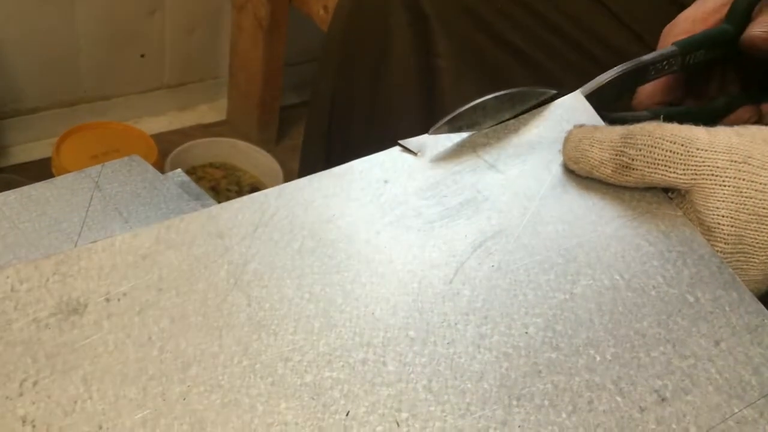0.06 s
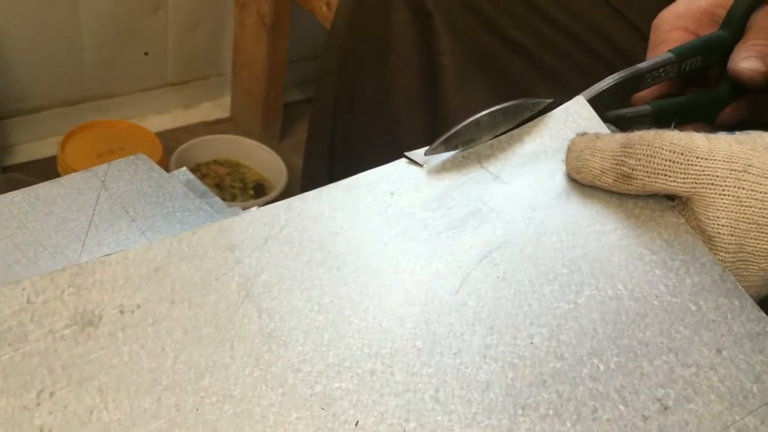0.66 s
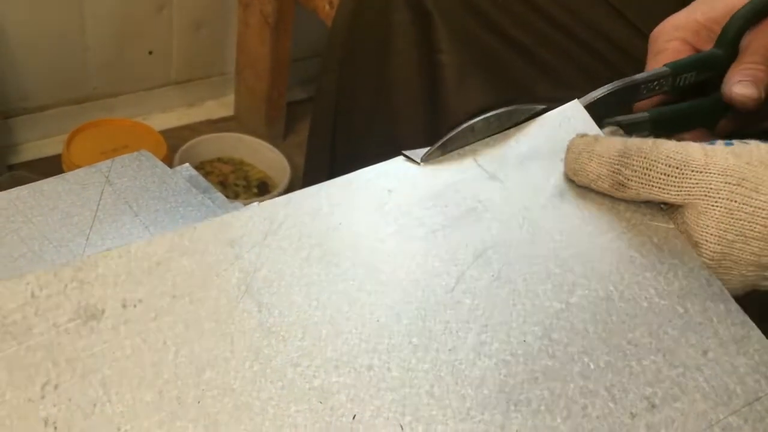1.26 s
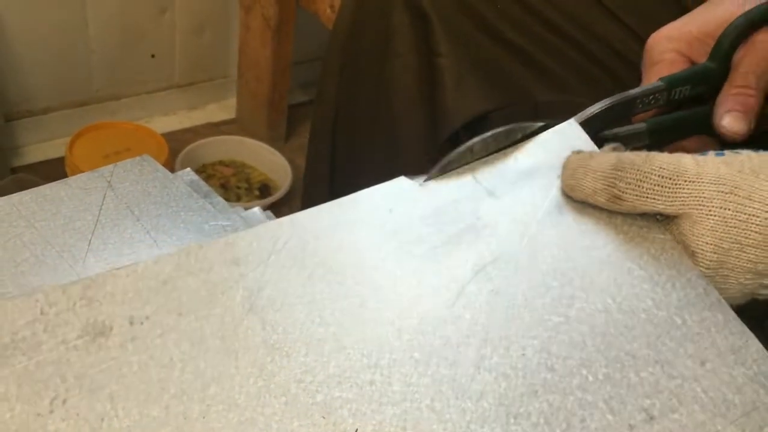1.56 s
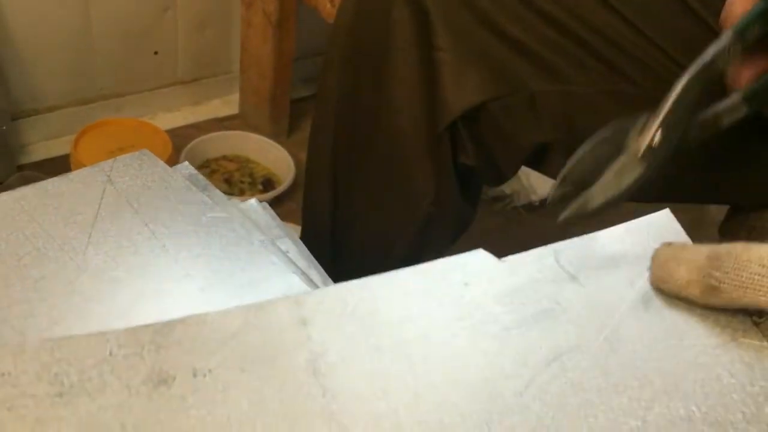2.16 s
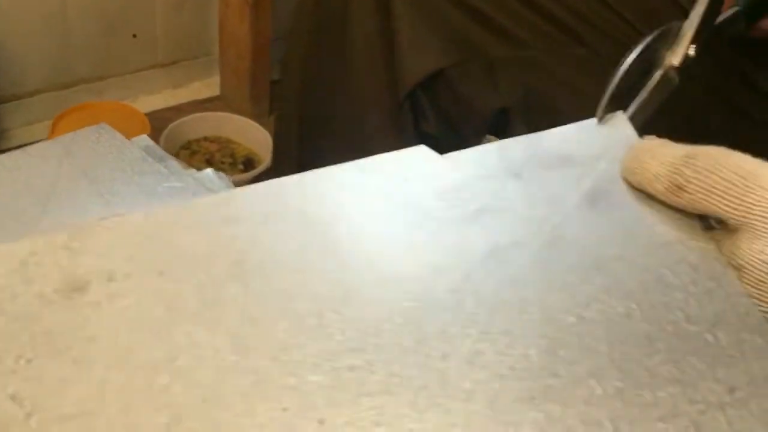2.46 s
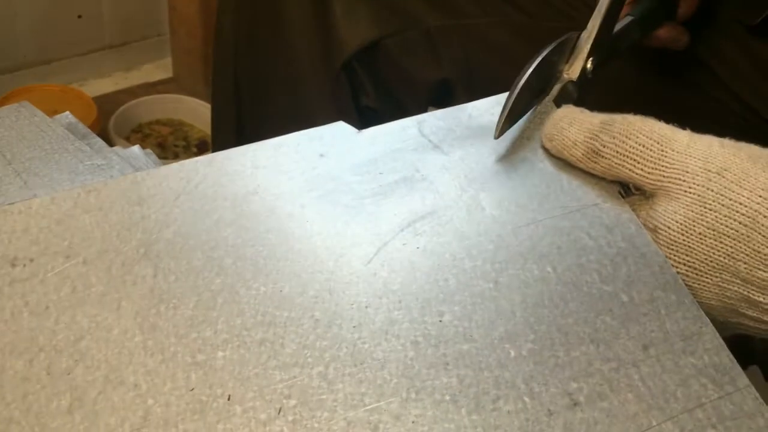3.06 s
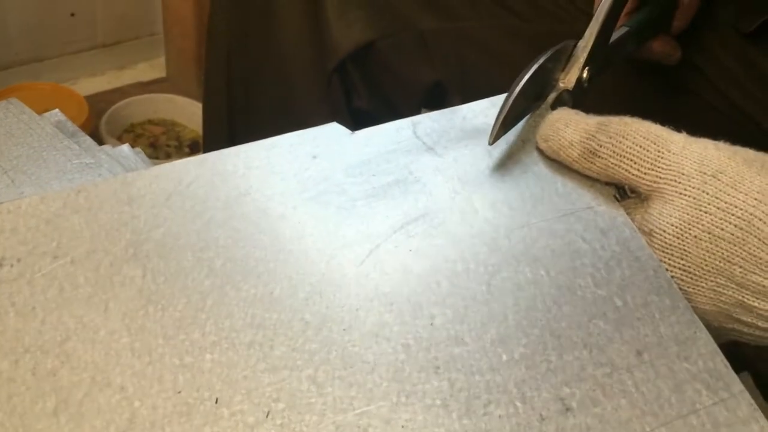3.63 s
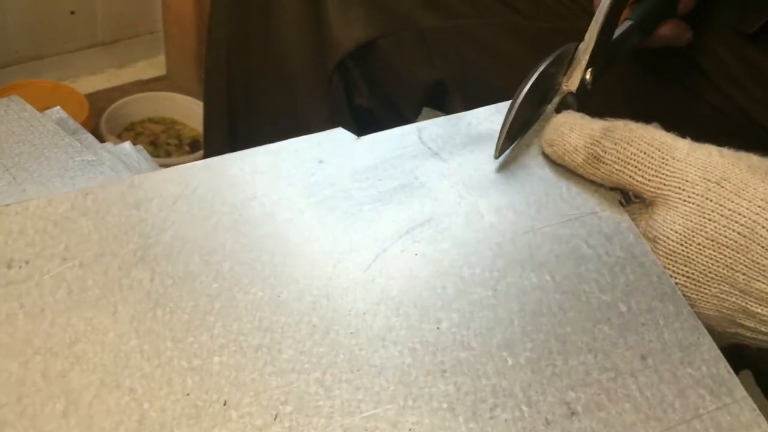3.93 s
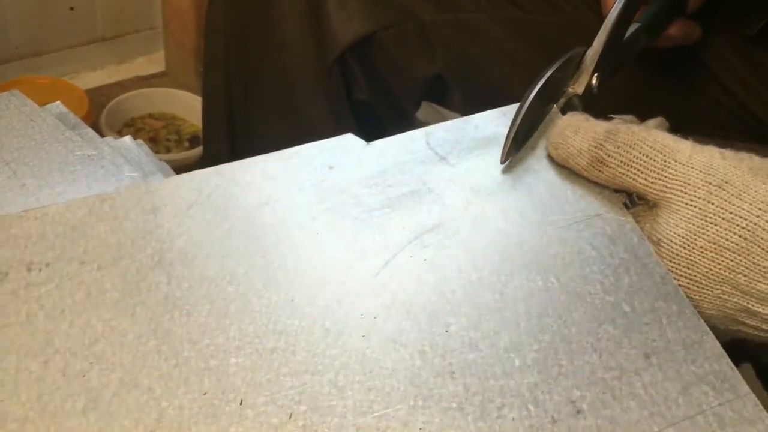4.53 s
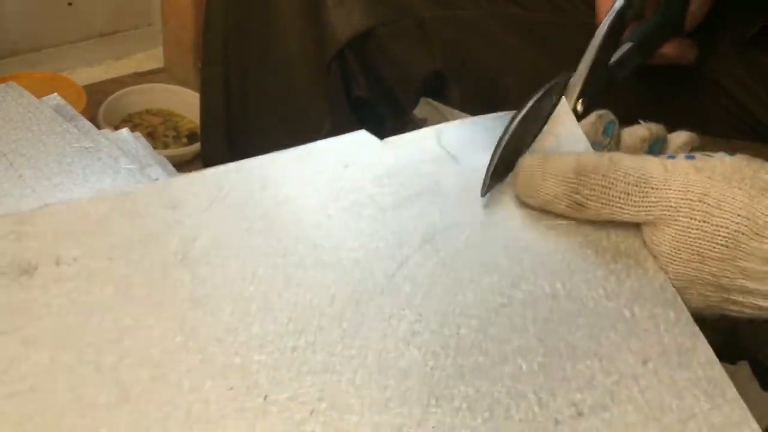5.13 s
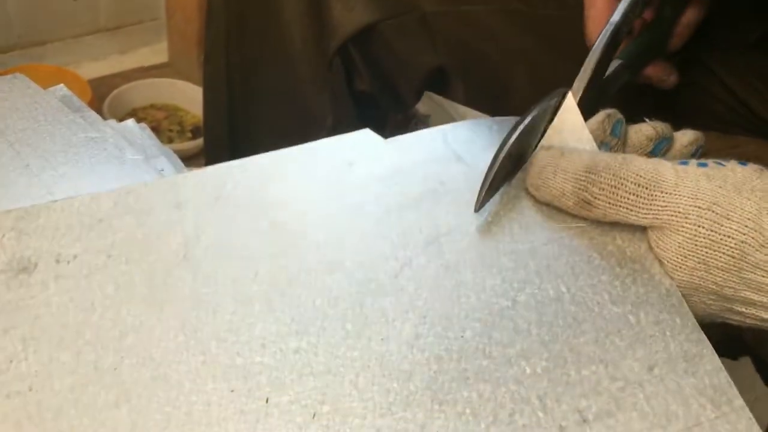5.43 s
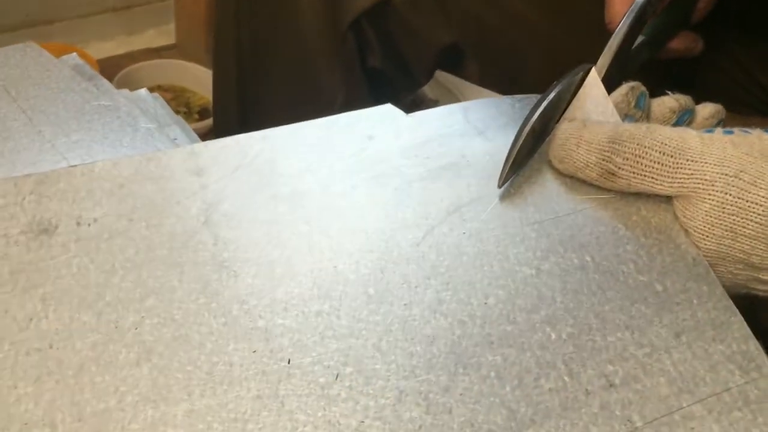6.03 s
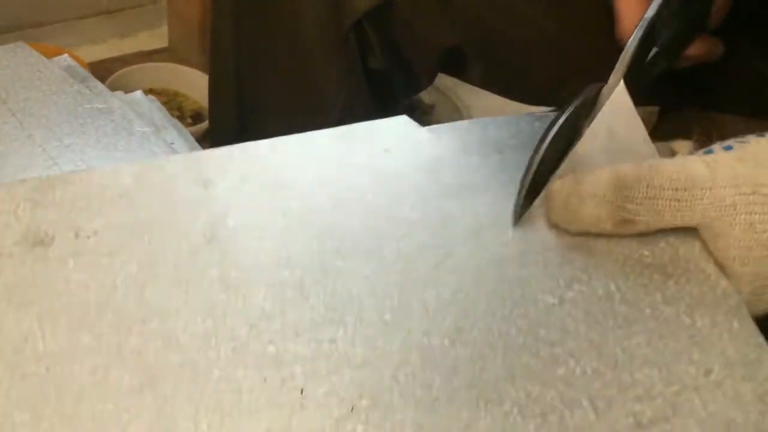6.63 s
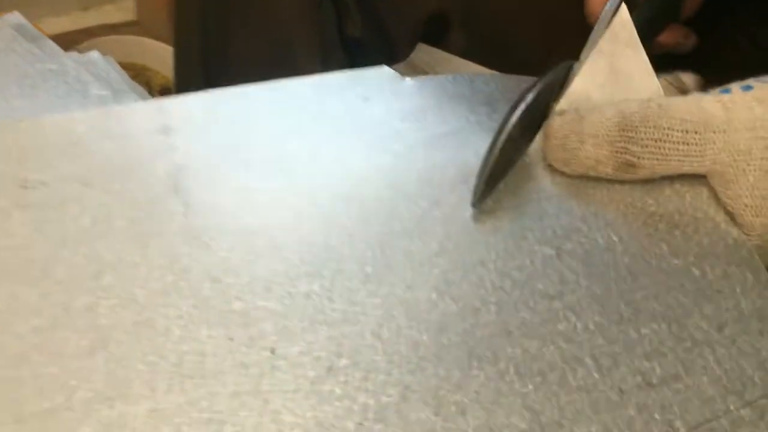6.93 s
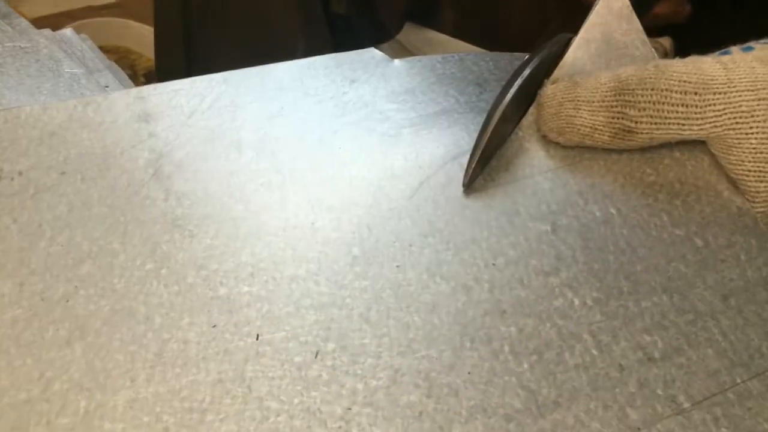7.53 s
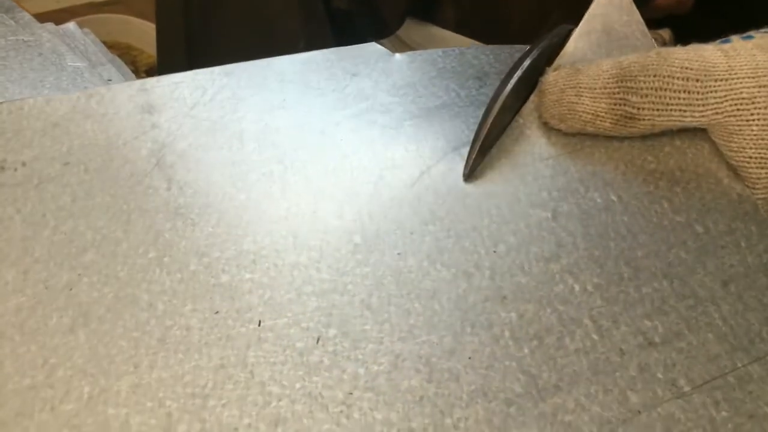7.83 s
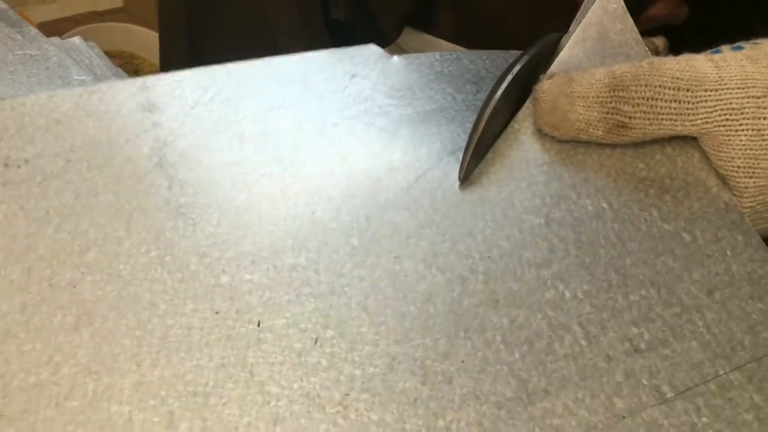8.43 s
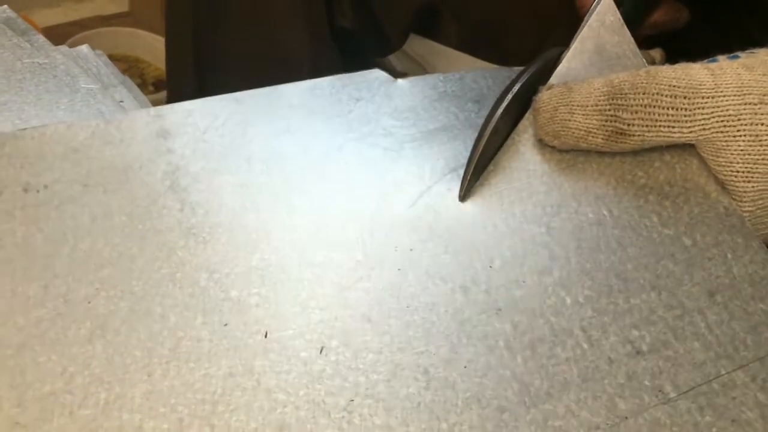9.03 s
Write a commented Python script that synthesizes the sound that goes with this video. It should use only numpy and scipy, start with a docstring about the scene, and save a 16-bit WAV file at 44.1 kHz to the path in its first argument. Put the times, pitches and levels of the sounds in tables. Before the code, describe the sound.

Tin snips bite through thin sheet metal with crunching clicks and clangs, while the sheet wobbles and scrapes over a low hum.

```python
"""A small workshop, close up at the bench: tin snips bite through a thin galvanized sheet.
A mains hum throbs underneath. The bench takes soft bumps; the blades clink and squeak, the pivot clacks.
Under the blades the sheet creaks and ticks; shoved about, it wobbles, scrapes and sings in sliding tones.
On top, each fracture knocks the sheet with a crunch and a clang and rings the strip curling off the cut.
Strain on the sheet lifts its pitch and thins its boom."""
import sys
import numpy as np
from scipy import signal
from scipy.fft import rfft, irfft
from scipy.io import wavfile

SR = 44100
rng = np.random.default_rng(int(sys.argv[2]) if len(sys.argv) > 2 else 0)


def master(y):
    """Save y as 16-bit WAV."""
    cut = np.clip(np.atleast_2d(y).T, -1, 1)
    pcm = np.round(cut * 32767)  # scale
    wavfile.write(sys.argv[1], SR, pcm.astype(np.int16))


N = 409248
TIME = np.arange(N) / SR
TAIL = TIME[:SR * 3 // 4]  # time axis of a one-shot

# Table levels are relative: each layer adds its own trims.
# tone of the room air: f/Hz, level/dB
AIR_EQ = [(15, -36), (25, -10.5), (55, -2), (75, -12.5), (107, -13), (126, -20), (160, -13), (267, -25.5),
          (305, -23.5), (469, -31.5), (523, -29), (703, -32), (1020, -34), (1850, -51), (4500, -58),
          (15500, -61)]
# partials of the hum: f/Hz, level/dB
HUM_PARTIALS = [(50, -54), (100, -60.5), (150, -61.5), (175, -64), (200, -71.5)]
# soft bumps against the bench: t/s, level/dB, f/Hz
BENCH_BUMPS = [(0.139, -33, 54.87), (0.179, -29.5, 63), (0.991, -30, 62), (2.313, -35, 64.6),
               (8.477, -29.5, 77.6)]
# one dull tick: t/s, level/dB, f/Hz, half-width/s
BENCH_TICK = (3.1765, -40, 1380, 0.0009)

# the blades clinking together: t/s, ring/dB, grit/dB, time until the hand mutes them/s
BLADE_CLINKS = [(2.354, -50, -62, 0.13), (2.549, -64, -60, 0.02), (2.571, -45, -51, 0.05)]
# ring of the blades: f/Hz, level/dB, t60/s
BLADE_MODES = [(4140, -10, .3), (5750, -11, .16), (6823, 0, .25), (7817, -6, .27), (8150, -2, .24),
               (8400, -6, .2), (11250, -8, .22), (11430, -8, .25), (12120, -4, .15), (13660, -8, .22),
               (15700, -5, .12)]
# squeaks of the blades rubbing each other and the cut edge, and short pings of the strip curling off the cut
# (the 3.2 kHz rows near 4.8 s): t/s, level/dB, f/Hz, bandwidth/Hz, decay/s
SQUEAKS_AND_PINGS = [(0.401, -48, 6680, 650, 0.024), (0.401, -54, 13500, 1800, .02),
                     (2.345, -40, 1830, 350, .016), (2.624, -48.5, 4360, 300, 0.007),
                     (2.624, -47.5, 5770, 350, 0.008), (4.427, -47, 3700, 1400, 0.006),
                     (4.764, -55, 3200, 300, 0.011), (4.803, -56, 3250, 350, 0.009),
                     (5.954, -50, 8900, 1500, 0.0036), (7.410, -45, 3000, 1400, 0.004),
                     (7.411, -51, 6200, 2200, 0.016), (7.411, -51, 4150, 200, 0.026)]
# the pivot catching: t/s, clack/dB, rasp/dB, rasp decay/s
PIVOT_CATCHES = [(0.008, -62, -54.5, 0.011), (0.018, -60, -55.5, 0.027), (0.578, -56.5, -76, 0.005),
                 (0.588, -57, -64, 0.0027)]
# clack of the pivot: f/Hz, level/dB, t60/s
PIVOT_MODES = [(2110, -8, .11), (3320, -5, .1), (4565, 1, .11), (5000, -7, .07), (6400, -6, .1),
               (7360, -5, .1), (8600, -3, .1), (10420, -5, .1), (12200, -4, .09), (13220, -3, .09)]

# the sheet's strongest modes: f/Hz, level/dB, t60/s
SHEET_MODES = [(293, -6, .5), (375, -5, .5), (530, -6, .35), (612, 1, .42), (785, -3, .4), (870, -6, .4),
               (952, 2, .42), (1055, -1, .42), (1305, -3, .35), (1372, -2, .35), (1825, 2, .35),
               (2255, 0, .42), (2640, -1, .3), (2923, -1, .3)]
# decay of its dense weaker modes and of the room: f/Hz, t60/s
WASH_DECAY = [(200, 0.73), (600, 0.77), (1000, 0.5), (2000, 0.4), (5000, 0.31), (14000, 0.28)]
# the blades strain the sheet and lift its resonances, slack lowers them: t/s, pitch factor
SHEET_STRAIN = [(1.7, 1.046), (2.0, 1.003), (2.5, 0.92), (2.85, 0.88), (4.5, 0.97), (5.2, 1.01),
                (6.0, 1.065), (6.42, 1.11), (6.77, 1.11), (6.95, 1.005), (7.5, 1.07), (7.85, 1.045),
                (8.2, 0.97), (9.15, 1.018)]
# the sheet's low heave: f/Hz, level/dB
BOOM_EQ = [(60, -35.5), (140, -7), (230, -5.5), (410, -5), (490, -5.5), (700, -37)]
# its midrange clang: f/Hz, level/dB
CLANG_EQ = [(300, -56), (480, -10), (590, 6.5), (720, 2.5), (960, 2), (1150, -8), (1400, -11.5),
            (1800, -27.5), (3500, -55)]
# the bite of breaking steel: f/Hz, level/dB
CRUNCH_EQ = [(600, -24), (1300, 9), (1750, 2), (2800, 2.5), (4500, -2.5), (7000, -13.5), (12000, -61)]
# the finest splinters: f/Hz, level/dB
SIZZLE_EQ = [(3500, -14), (6500, 0.5), (8500, 0), (10500, -5.5), (15000, -5)]
# steel sliding on steel: f/Hz, level/dB
SCRAPE_EQ = [(700, -12), (1400, 9.5), (2000, 0), (3100, 2), (5000, -1), (7500, -3), (10500, -7.5),
             (15000, -8.5)]
# the strip curling off the cut: f/Hz, level/dB, t60/s
OFFCUT_MODES = [(2630, 6.5, 0.17), (2830, 5.5, 0.098), (3176, -1, 0.27), (3520, 2, 0.15)]
# the severed strip ringing freely: f/Hz, level/dB, t60/s
SEVERED_MODES = [(2256, -13, .6), (3408, -2, .22), (3989, 0, .33), (4737, -4, .29), (5356, -5, .26),
                 (8565, -14, .26)]

# tiny fractures at the cutting edge: t/s, tick/dB, knock/dB
EDGE_TICKS = [(0.231, -67, -58), (0.683, -65, -41), (1.091, -62, -34.5), (1.169, -60, -33),
              (2.855, -62.5, -43.5), (2.918, -57.5, -44), (4.425, -55, -53), (4.654, -65, -44.5),
              (4.802, -64, -40), (4.853, -64, -40), (4.966, -59, -59), (5.806, -69, -43.5),
              (5.955, -63, -70), (6.246, -76, -39), (6.273, -66, -41), (6.376, -68, -36), (6.440, -67, -40),
              (6.461, -70, -39), (6.732, -65, -45), (6.801, -51, -30.5), (6.904, -57, -41.5),
              (7.410, -63, -34), (7.514, -73, -35.5), (7.712, -79, -35), (7.823, -49, -31.5),
              (7.907, -76, -35)]
# single resonances sliding as the sheet bends: t/s, length/s, level/dB, start f/Hz, end f/Hz
BEND_GLIDES = [(0.33, 0.149, -45.5, 410, 351), (1.268, 0.19, -40.5, 285.2, 347),
               (1.879, 0.31, -37.5, 614, 578), (1.92, 0.17, -41, 299, 235), (1.99, 0.14, -41.5, 174.5, 163),
               (2.334, 0.074, -36, 421, 406), (2.479, 0.47, -45, 583.5, 487), (2.56, 0.11, -40, 235, 177),
               (2.586, 0.13, -42, 85, 49.4), (2.659, 0.26, -40.5, 229, 135),
               (5.187, 0.16, -37.5, 414.6, 382), (6.389, 0.2, -44, 988, 1095),
               (6.754, 0.094, -44.5, 1051, 798), (7.679, 0.095, -44, 965, 926),
               (9.165, 0.05, -30, 300.6, 270)]
# shoves that bend and slide the sheet: t/s, rise/s, hold/s, wobble/dB, scrape/dB
SHEET_SHOVES = [(1.238, 0.083, 0.017, -38.5, -58), (1.866, 0.027, 0.15, -40, -54.5),
                (2.256, 0.026, 0.063, -67, -60.5), (2.503, 0.077, 0.0065, -42, -47),
                (2.637, 0.018, 0.025, -48, -64), (2.852, 0.0092, 0.06, -57.5, -59),
                (4.91, 0.086, .012, -51.5, -64.5), (5.138, 0.048, 0.02, -39, -45),
                (5.448, 0.058, 0.0065, -55, -63), (6.476, 0.015, 0.12, -54, -65.5),
                (6.709, 0.051, 0.033, -41, -48), (9.168, 0.0058, 0.056, -37.5, -72.5)]
# the steel breaking or the blades striking it: t/s, knock/dB, knock f/Hz, ring/dB, crunch/dB
SHEET_BLOWS = [(0.007, -33, 790, -37, -53.5), (0.315, -33, 596, -51, -62), (0.327, -25.5, 543, -37.5, -57),
               (0.401, -26.5, 636, -33, -56), (0.916, -24, 836.2, -40, -53.5),
               (0.971, -24.5, 960, -40.5, -56.5), (1.046, -28.5, 590, -44, -63),
               (1.109, -14.5, 820, -34, -46.5), (1.675, -1.5, 875, -21.5, -30.5),
               (1.693, -7, 607, -32.5, -36.5), (1.893, -30, 670, -42, -57), (2.34, -24, 452, -34.5, -40.5),
               (2.347, -12, 450, -33.5, -35.5), (2.4875, -16, 930, -32.5, -43.5),
               (4.562, -32, 720, -48, -61.5), (4.761, -23, 670, -45, -54.5), (4.877, -38, 576, -34, -49.5),
               (5.171, -16, 686, -30, -48), (5.193, -17.5, 794, -26.5, -44), (6.073, -32, 849.6, -66, -71),
               (6.209, -24.5, 800, -41, -55.5), (6.300, -20, 920, -34, -52.5),
               (6.396, -21.5, 920, -33.5, -50), (7.408, -31, 660, -36, -44.5), (7.511, -50, 720, -35, -54),
               (7.658, -26.5, 610, -36, -53), (7.810, -28, 1090, -33, -57), (7.825, -24, 680, -29.5, -49.5),
               (8.194, -22.5, 710, -40, -59.5), (8.431, -35, 825, -50, -77), (8.515, -27.5, 855, -45, -66),
               (8.54, -24.5, 780, -39, -63), (8.884, -31, 624, -46, -88), (9.133, -22, 940, -29, -48),
               (9.165, -20, 619.6, -27.5, -49.5)]

LIGHT_KNOCK_HZ = 820  # on the unstrained sheet
ATTACK = 1024  # samples over which a hit's level is set


def amp(db):
    """Decibels to gain."""
    return 10 ** (np.asarray(db) / 20)


def unit(x, size=None):
    """Scales to rms 1, judged over the first size samples."""
    return x / np.sqrt(np.mean(x[:size] ** 2) + 1e-20)


def curve_at(points, hz):
    """Reads a curve on a log-frequency axis."""
    f, value = np.transpose(points)
    return np.interp(np.log(hz + 1), np.log(f), value)


def add(mix, s, sound):
    """Drops a sound into the mix at time s."""
    part = mix[max(round(s * SR), 0):][:len(sound)]
    part += sound[:len(part)]


def colour(x, eq, size=4096):
    """Minimum-phase EQ, rolling off 12 dB per octave beyond the ends of the curve."""
    hz = abs(np.fft.fftfreq(size, 1 / SR))
    beyond = abs(np.log((hz + 1) / np.clip(hz + 1, eq[0][0], eq[-1][0])))
    log_gain = np.log(amp(curve_at(eq, hz))) - 2 * beyond
    taps = np.fft.ifft(np.exp(np.conj(signal.hilbert(log_gain)))).real
    return signal.oaconvolve(x, taps[:size // 2])[:len(x)]


def drift(per_s):
    """Random modulator, gliding to a new value per_s times a second."""
    knots = rng.standard_normal(4096)
    return np.interp(TIME * per_s, np.arange(len(knots)), knots)


def modes(table, pitch=1, spread_db=3):
    """Dying sines; each hit lands elsewhere and weights them a little differently."""
    out = np.zeros(len(TAIL))
    for hz, db, t60 in table:
        envelope = amp(db + rng.normal(0, spread_db) - 60 * TAIL / t60)
        out += envelope * np.sin(2 * np.pi * (hz * pitch * TAIL + rng.random()))
    return out


def ping(table):
    """A small steel part ringing, its attack at unit level."""
    return unit(modes(table, spread_db=0.62), ATTACK)


def slips(decay_s):
    """A short, spiky run of slips in the steel."""
    spikes = rng.standard_normal(len(TAIL)) * rng.standard_normal(len(TAIL))
    return unit(spikes) * np.exp(-TAIL / decay_s)


def wash():
    """Countless close modes and reflections, each band dying at its own speed."""
    hz, t, bands = signal.stft(rng.standard_normal(len(TAIL)), SR, nperseg=256)
    decay = amp(-60 * t / curve_at(WASH_DECAY, hz)[:, None])
    _, tail = signal.istft(bands * decay, SR, nperseg=256)
    return unit(tail[:len(TAIL)], ATTACK)


def room_tone(air_db=-46, throb_depth=0.24, throb_hz=25, waver_db=2.5, swell_db=1):
    """The bed: gently swelling air, a throbbing low rumble and a wavering mains hum."""
    air = amp(air_db) * unit(colour(rng.standard_normal(N), AIR_EQ))
    rumble = signal.sosfiltfilt(signal.butter(2, 250, fs=SR, output="sos"), air)
    throb = throb_depth * rumble * np.sin(2 * np.pi * throb_hz * TIME)
    hum = np.zeros(N)
    for hz, db in HUM_PARTIALS:
        level = np.sqrt(2) * amp(db + waver_db * drift(8))
        hum += level * np.sin(2 * np.pi * hz * TIME + .4 * drift(5))
    return air * amp(swell_db * drift(2.6)) + throb + hum


def thud(t, hz, half_s):
    """A few cycles under a bell-shaped envelope centred on t = 0."""
    return np.exp(-(t / half_s) ** 2) * np.cos(2 * np.pi * hz * t)


def bench(bump_half_s=0.0085):
    """Soft pushes rock the bench briefly; one dull tick stops at once."""
    hits = [(*bump, bump_half_s) for bump in BENCH_BUMPS] + [BENCH_TICK]
    return sum(amp(db) * thud(TIME - s, hz, half_s) for s, db, hz, half_s in hits)


def snips(grit_s=.025, chatter_depth=2.1, chatter_per_s=260):
    """The tool's own voice: gritty blade clinks, the loose pivot's chattering clack, rubbing squeaks, and among
    them short pings of the cut strip."""
    out = np.zeros(N)
    for s, ring_db, grit_db, free_s in BLADE_CLINKS:
        grit = unit(colour(slips(grit_s), SIZZLE_EQ), ATTACK)
        hand_mute = np.exp(-(TAIL / free_s) ** 2)
        add(out, s, amp(ring_db) * ping(BLADE_MODES) * hand_mute + amp(grit_db) * grit)
    for s, clack_db, rasp_db, rasp_s in PIVOT_CATCHES:
        clack = ping(PIVOT_MODES) * (1 + chatter_depth * drift(chatter_per_s)[:len(TAIL)])
        rasp = colour(slips(rasp_s), SIZZLE_EQ)
        add(out, s, amp(clack_db) * unit(clack, ATTACK) + amp(rasp_db) * unit(rasp, ATTACK))
    hz = np.fft.rfftfreq(len(TAIL), 1 / SR)
    for s, db, centre_hz, width_hz, decay_s in SQUEAKS_AND_PINGS:
        resonance = 1 / (1 + (2 * (hz - centre_hz) / width_hz) ** 2)
        squeak = irfft(rfft(rng.standard_normal(len(TAIL))) * resonance, len(TAIL))
        envelope = np.exp(-TAIL / decay_s) * np.minimum(TAIL / 0.0001, 1)
        add(out, s, amp(db) * unit(squeak) * envelope)
    return out


def strain(s):
    """Pitch factor of the sheet at time s: above 1 taut, below 1 slack."""
    return np.interp(s, *np.transpose(SHEET_STRAIN))


def taut_clang_eq(s, tilt_db_per_strain=28):
    """Strain lifts the clang and tips it towards its upper modes."""
    pitch = strain(s)
    db_per_octave = tilt_db_per_strain * (pitch - 1)
    return [(hz * pitch, db + db_per_octave * np.clip(np.log2(hz / LIGHT_KNOCK_HZ), -1, .5))
            for hz, db in CLANG_EQ]


def local_crunch_eq(ripple_db=3.5, points=90):
    """Each place along the cut favours other clusters of modes."""
    hz = np.geomspace(CRUNCH_EQ[0][0], CRUNCH_EQ[-1][0], points)
    return np.transpose([hz, curve_at(CRUNCH_EQ, hz) + ripple_db * rng.standard_normal(points)])


def sheet_ring(pitch):
    """The sheet's answer to one tap: a few distinct modes in a wash of weak ones."""
    return wash() + amp(-19.5) * modes(SHEET_MODES, pitch)


def knock(hz, crest_s=0.003413, half_s=0.0019, rebound_gain=0.405, rebound_s=0.0055):
    """The sheet jerks for a few cycles, then waves come back from its edges."""
    age = TAIL / rebound_s
    swell = (age * np.exp(1 - age)) ** 2
    rebound = unit(colour(rng.standard_normal(len(TAIL)), CLANG_EQ))
    return thud(TAIL - crest_s, hz, half_s) + rebound_gain * swell * rebound


def creaks(level_db=-63, per_s=17, grit_db=-21):
    """While the blades bear down, the strained sheet keeps giving in tiny gritty jerks."""
    cutting = (TIME < 1.6) | (TIME > 4.5)
    jerks = cutting * (rng.random(N) < per_s / SR) * amp(rng.uniform(-6, 6, N))
    shaken = 16 * jerks + signal.oaconvolve(jerks, wash())[:N] / 2
    body = unit(colour(shaken, CLANG_EQ))
    grit = unit(colour(shaken, CRUNCH_EQ))
    return amp(level_db) * (body + amp(grit_db) * grit)


def nibbles(tick_s=0.0054, offcut_db=-11, ring_db=-15):
    """Each tiny fracture ticks, nudges the sheet and rings the curling strip."""
    out = np.zeros(N)
    for s, tick_db, knock_db in EDGE_TICKS:
        tick = unit(colour(slips(tick_s), SCRAPE_EQ), size=256)
        add(out, s, amp(tick_db) * (tick + amp(offcut_db) * ping(OFFCUT_MODES)))
        ring = unit(colour(sheet_ring(strain(s)), taut_clang_eq(s)), ATTACK)
        nudge = knock(LIGHT_KNOCK_HZ * strain(s))
        add(out, s - .001, amp(knock_db) * (nudge + amp(ring_db) * ring))
    return out


def singing_bends(shiver_depth=1.2, shiver_per_s=115):
    """Bending sets one resonance singing: it swells quickly, slides and fades."""
    out = np.zeros(N)
    for s, length_s, db, start_hz, end_hz in BEND_GLIDES:
        progress = np.arange(0, 1, 1 / (length_s * SR))
        turns = np.cumsum(start_hz * (end_hz / start_hz) ** progress) / SR + rng.random()
        shiver = drift(shiver_per_s) + 1j * drift(shiver_per_s)  # roughens both level and phase
        tone = ((1 + shiver_depth * shiver[:len(turns)]) * np.exp(2j * np.pi * turns)).real
        envelope = np.sin(np.pi * progress ** 0.61) ** 2
        add(out, s, amp(db) * envelope * unit(tone))
    return out


def shove_envelope(start, rise, hold, t60):
    """Swells, holds, then dies away."""
    t = TIME - start
    attack = np.clip(t / rise, 0, 1) ** 1.58
    return attack * amp(-60 * np.clip(t - rise - hold, 0, 2 * t60) / t60)


def flexing(rattle_db=2, rattle_per_s=130, boom_db=-2, boom_db_per_strain=-15, clang_db=-1,
            scrape_db=-2, wobble_t60_s=0.71, scrape_t60_s=0.46):
    """Dense rubbing contacts shake the shoved sheet; it wobbles on longer than it scrapes."""
    rub = unit(rng.standard_normal(N) * amp(rattle_db * drift(rattle_per_s)))
    gripped_ring = modes(SHEET_MODES) * np.exp(-TAIL / .016)
    hollow = rub + .25 * unit(signal.oaconvolve(rub, gripped_ring)[:N])
    # slow bending barely stirs the upper modes
    shaken = signal.sosfilt(signal.butter(3, 1050, fs=SR, output="sos"), hollow)
    varispeed = np.cumsum(strain(TIME)) / SR % TIME[-1]  # strain slides the modes up and down
    boom = np.interp(varispeed, TIME, unit(colour(shaken, BOOM_EQ)))
    clang = np.interp(varispeed, TIME, unit(colour(shaken, CLANG_EQ)))
    body = amp(boom_db + boom_db_per_strain * (strain(TIME) - 1)) * boom + amp(clang_db) * clang
    wobble_level, scrape_level = np.zeros((2, N))
    for *timing, wobble_db, slide_db in SHEET_SHOVES:
        wobble_level += amp(wobble_db) * shove_envelope(*timing, wobble_t60_s)
        scrape_level += amp(slide_db + scrape_db) * shove_envelope(*timing, scrape_t60_s)
    return wobble_level * body + scrape_level * unit(colour(rub, SCRAPE_EQ))


def severed_strip(s=1.681, level_db=-45):
    """One bite severs the strip, which rings freely."""
    out = np.zeros(N)
    add(out, s, amp(level_db) * ping(SEVERED_MODES))
    return out


def blows(knock_trim_db=-6.5, ring_trim_db=-7, crunch_trim_db=-2, offcut_db=-13,
          snap_db=14, snap_s=0.00257, snap_half_s=0.0004, crumble_db=7, crumble_s=0.013,
          yield_db=-30, yield_lead_s=.004, lag_s=.0018, rise_s=0.00039, glove_damping_s=0.27):
    """The steel yields, gives with a knock, a snap and a crumble of slips, then the sheet rings on."""
    out = np.zeros(N)
    onset = 1 - np.exp(-TAIL / rise_s)
    for s, knock_db, hz, ring_db, crunch_db in SHEET_BLOWS:
        tautness = strain(s) - 1
        boom_db = ring_db - 3.5 - 76 * tautness  # the tauter the sheet, the less it booms
        sizzle_db = crunch_db - 8.5 - 13 * tautness  # the grip of the blades damps the treble
        sizzle_db += 0.5747 * (crunch_db + 45)  # harder breaks splinter more finely
        ring = sheet_ring(strain(s)) * onset
        snap = rng.standard_normal(len(TAIL)) * np.exp(-((TAIL - snap_s) / snap_half_s) ** 2)
        fracture = amp(snap_db) * snap + amp(crumble_db) * slips(crumble_s) * onset + ring
        hit = amp(knock_db + knock_trim_db) * knock(hz)
        layers = [(boom_db + ring_trim_db, ring * np.exp(-TAIL / glove_damping_s), BOOM_EQ),
                  (ring_db + ring_trim_db, ring, taut_clang_eq(s)),
                  (crunch_db + crunch_trim_db, fracture, local_crunch_eq()),
                  (sizzle_db + crunch_trim_db, fracture, SIZZLE_EQ)]
        for db, source, eq in layers:
            hit += amp(db) * unit(colour(source, eq), ATTACK)
        offcut = unit(modes(OFFCUT_MODES, pitch=rng.uniform(0.87, 1.0)), ATTACK)
        hit += amp(crunch_db + offcut_db) * offcut * onset
        add(out, s - yield_lead_s, amp(knock_db + yield_db) * knock(hz))  # slight give before the break
        add(out, s + lag_s, hit)
    return out


def scene(reverb_db=-7):
    """Mono mix of sheet, tool, bench and room tone, with a reverb send on the tool."""
    tool, room = snips(), wash()
    reverb = signal.oaconvolve(tool, room / np.linalg.norm(room))[:N]
    sheet = blows() + severed_strip() + flexing() + singing_bends() + nibbles() + creaks()
    return (sheet + tool + amp(reverb_db) * reverb + bench() + room_tone())[None]


def record(dry, low_cut_hz=34, high_cut_hz=15950):
    """Master EQ: a low cut and a steep high cut."""
    dry = signal.sosfiltfilt(signal.butter(4, low_cut_hz, "high", fs=SR, output="sos"), dry)
    high_cut = signal.firwin(511, high_cut_hz, window=("kaiser", 9), fs=SR)
    return signal.oaconvolve(dry, high_cut[None], "same")


dry = scene()
out = record(dry)
master(out)
```